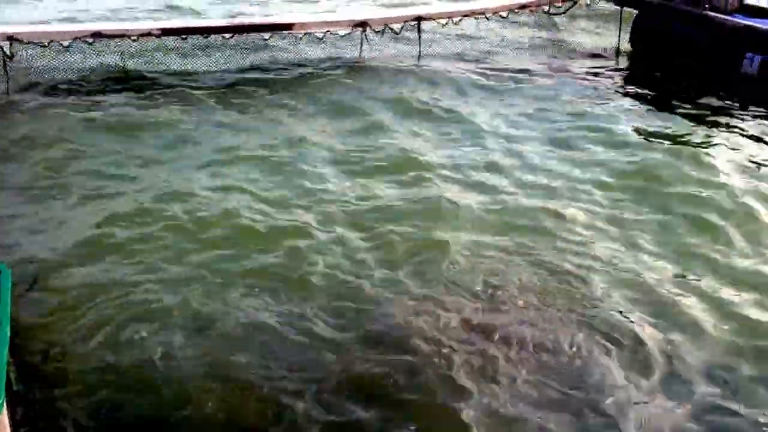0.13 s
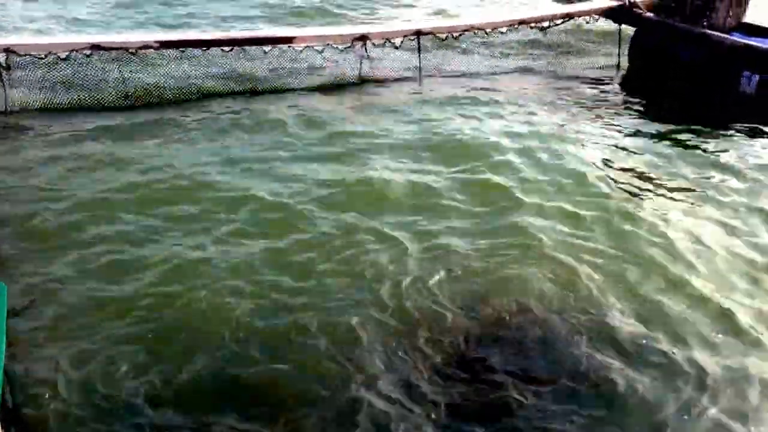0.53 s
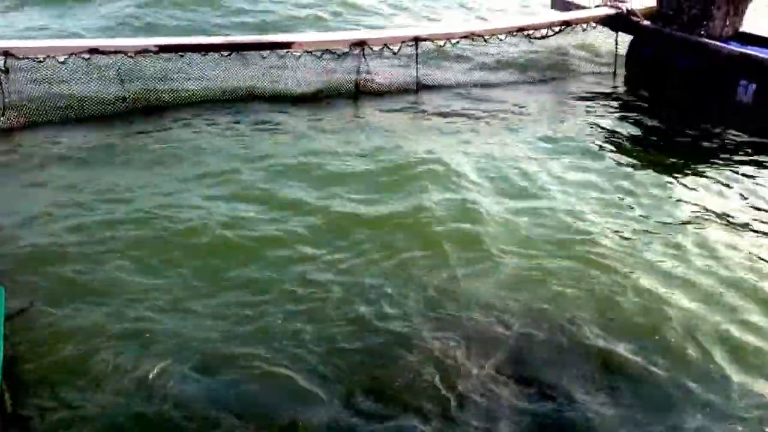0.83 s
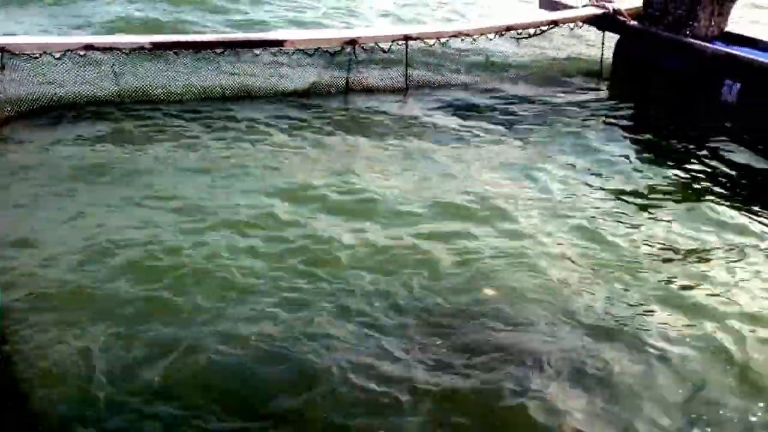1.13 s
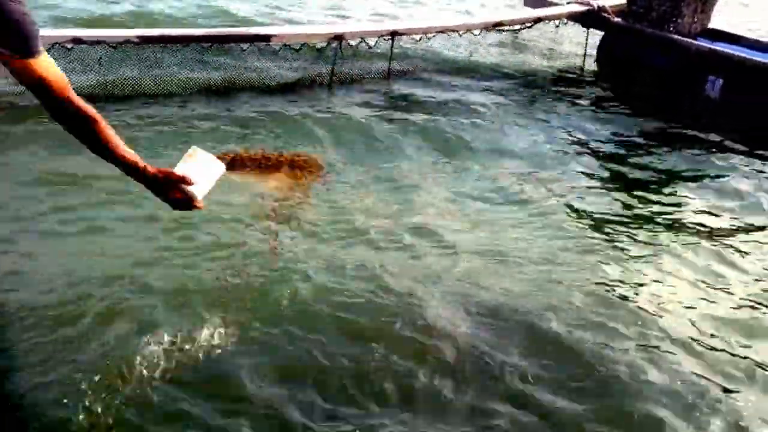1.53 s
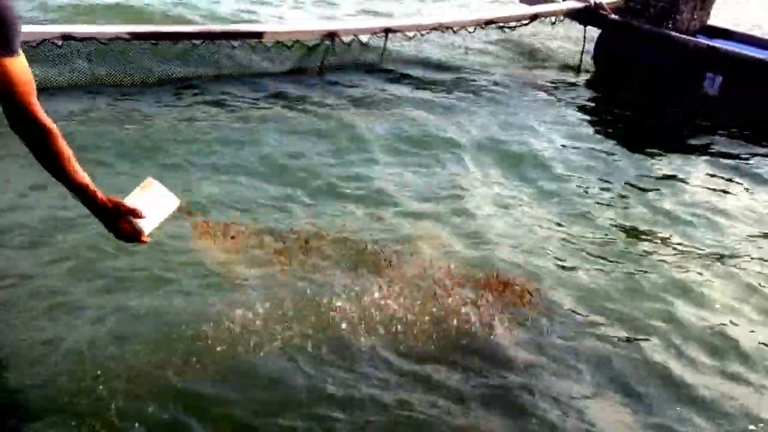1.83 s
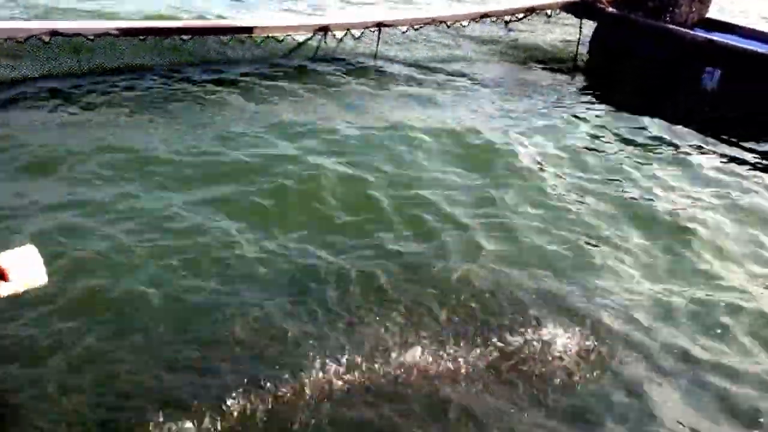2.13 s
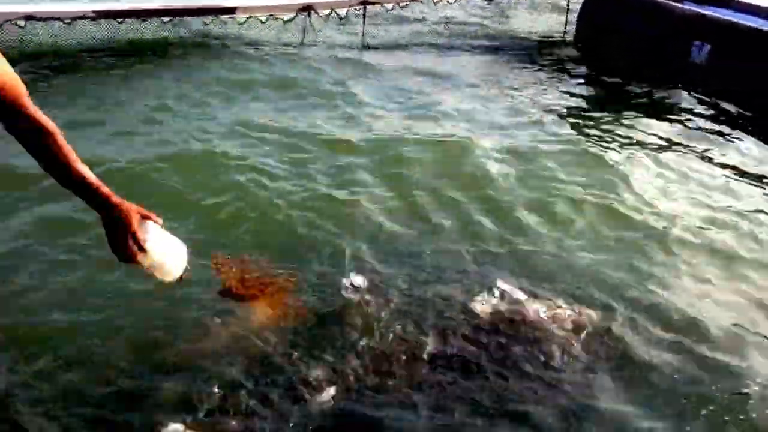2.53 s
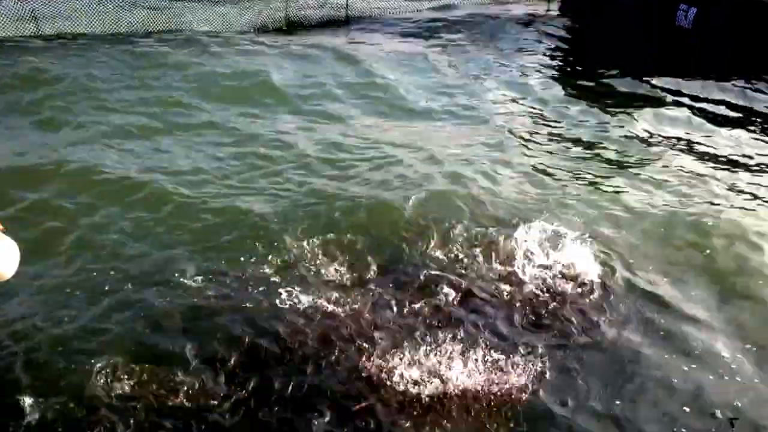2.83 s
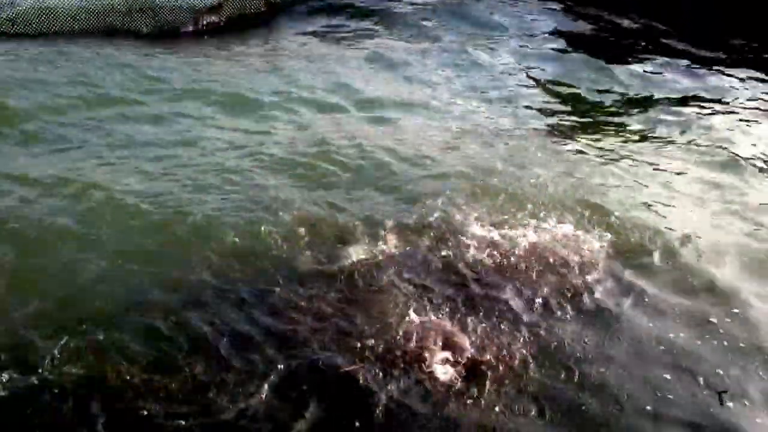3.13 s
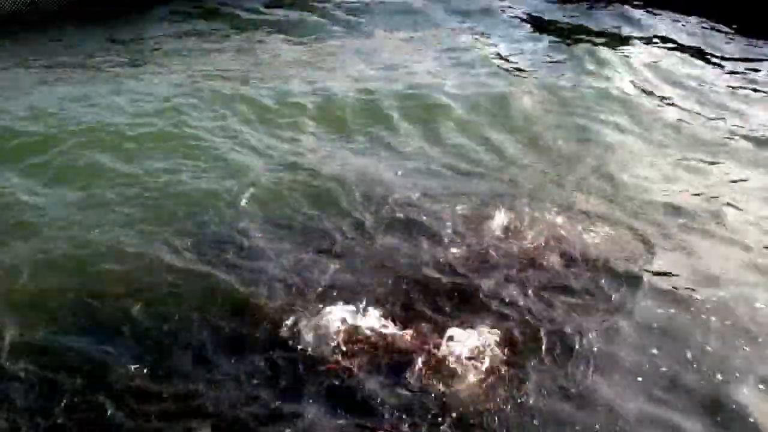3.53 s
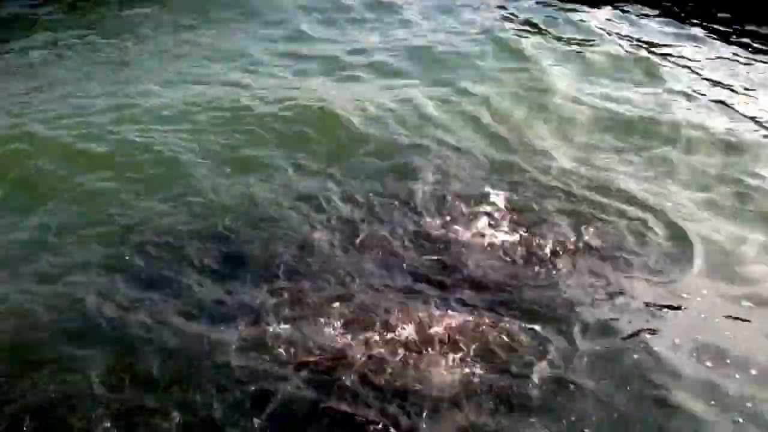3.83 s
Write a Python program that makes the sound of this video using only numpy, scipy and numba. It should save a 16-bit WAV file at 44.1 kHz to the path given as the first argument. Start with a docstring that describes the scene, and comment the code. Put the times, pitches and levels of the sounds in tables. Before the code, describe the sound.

Sharp, popping fish slaps and wet flops break out after a quieter lapping start, with short showers of pellets on water, single drips and hollow float knocks, heard close outdoors.

```python
"""Feeding time at a floating fish pen

Heard from the edge: fish snap and thrash, each slap a pressure crack, a ringing air pocket and grainy spray.
Flops are bursts of tiny bubbles, gulps and drops single rising bubbles; pellets slide and patter as ticks.
Waves thump the floats as short pressure pulses, and low grains slosh under them.
Behind it all the churning surface is a cloud of small bubbles over soft noise."""
import sys
import numpy as np
from scipy import signal
from scipy.fft import rfft, irfft
from scipy.io import wavfile
from numba import njit

SR = 44100
rng = np.random.default_rng(int(sys.argv[2]) if len(sys.argv) > 2 else 0)


def output_pcm(signal):
    """Save a mono or channel-first signal as 16-bit PCM at the path in sys.argv[1].

    Samples are clipped to [-1, 1] before scaling.
    """
    pcm = np.clip(np.atleast_2d(signal).T, -1, 1) * 32767
    wavfile.write(sys.argv[1], SR, np.round(pcm).astype(np.int16))


N = 176400  # four seconds

# Spectra: f/Hz, level/dB (per Hz, relative within each table)
# fish slaps: t/s, crack level/dB, air pocket level/dB, pocket f/Hz, spray level/dB
SLAPS = [(0.0345, -17, -21, 3620, -29.5), (1.8317, -7, -15, 2780, -23), (2.4932, -13.5, -20.5, 2390, -46),
         (2.6344, -18, -12, 3710, -28), (2.6914, -7, -18, 1304, -37), (3.0243, -31, -11, 3550, -59),
         (3.6226, -1, -7.5, 2780, -35), (3.977, -34, -21, 2920, -30.5)]
# spectrum of thrown spray: f/Hz, level/dB
SPRAY_SPECTRUM = [(150, -34), (400, -1.5), (3200, 3), (8000, -7.5), (15000, -17)]
# wet flops of fins and tails: t/s, level/dB, middle f/Hz
FLOPS = [(1.7310, -27.5, 1700), (1.753, -27.5, 2200), (1.782, -28, 1410), (1.840, -31, 1700),
         (1.976, -38, 3300), (2.053, -25.5, 2030), (2.264, -33, 1300), (2.564, -34, 1200),
         (2.643, -32, 2400), (2.79, -30, 3200), (3.028, -26.5, 3140), (3.917, -39, 2400)]
# gulps and large bubbles: t/s, level/dB, f/Hz
GULPS = [(.091, -32.5, 620), (1.78, -27.5, 637), (1.798, -29, 1140), (1.828, -24, 870), (2.451, -30, 770),
         (2.501, -30.5, 1090), (2.636, -29.5, 690), (3.1318, -26, 1490), (3.438, -28.5, 940),
         (3.493, -23.5, 510), (3.577, -27, 596), (3.919, -38, 332), (3.9695, -14.5, 1510)]
# single drops and small snaps: t/s, level/dB, f/Hz
DROPS = [(.8575, -30, 6500), (1.203, -24.5, 5400), (1.412, -30.5, 3600), (2.1988, -22, 3800),
         (2.4749, -24.5, 3630), (2.7668, -25, 2720), (3.5658, -22.5, 4100), (3.640, -29, 5550)]
# pellets shifting and sliding in the scoop: t/s, length/s, level/dB
SLIDES = [(.85, 0.071, -45), (.98, 0.078, -43.5), (1.07, 0.059, -45), (1.39, 0.3, -45),
          (2.52, 0.095, -42.5)]
# spectrum of sliding pellets: f/Hz, level/dB
SLIDE_SPECTRUM = [(1500, -11), (3000, 0.5), (3900, 4), (5000, -5), (12000, -23)]
# showers of pellets and thrown water landing: t/s, length/s, level/dB
SHOWERS = [(-.03, 0.15, -55.5), (1.68, 0.11, -43), (2.03, 0.12, -36), (2.885, 0.081, -36),
           (3.962, .06, -32)]
# spectrum of the showers: f/Hz, level/dB
SHOWER_SPECTRUM = [(120, -59), (200, -45), (321, -15), (630, -6.5), (1400, -6), (1950, -6.5), (2850, -1),
                   (15500, -21.5)]
# hollow thumps of waves under the floats, and at 1.833 s the low body of a fish's gulp: t/s, level/dB, f/Hz,
# half-width/cycles
THUMPS = [(0.0875, -17, 340, 0.37), (0.0965, -16.5, 332, 0.28), (0.1033, -22, 226, 2),
          (0.196, -30, 152, 0.63), (0.7831, -17.5, 208, 0.29), (0.8645, -23, 251, 0.29),
          (1.044, -25.5, 233, 0.52), (1.078, -20, 230, 0.72), (1.222, -36.5, 159, 1.8),
          (1.353, -38.5, 152, 0.74), (1.833, -22, 323, 0.76), (1.978, -34, 142, 0.43),
          (2.215, -33.5, 263, 1.9), (2.260, -33, 182, 0.61), (2.497, -32, 161, 0.53),
          (2.752, -42.5, 140, 0.64)]
# sloshes under the floats: t/s, length/s, level/dB
SLOSHES = [(.078, 0.041, -31), (.735, 0.051, -41.5), (.905, 0.015, -40), (1.195, 0.0077, -43),
           (2.195, 0.029, -41.5)]
# spectrum of sloshing and lapping: f/Hz, level/dB
SLOSH_SPECTRUM = [(40, -19.5), (150, 0), (260, 1), (450, -11.5), (2500, -26.5)]
# churning of the surface: t/s, level/dB
CHURN = [(0, -37), (.2, -46.5), (.45, -49.5), (.75, -51.5), (1.02, -45.5), (1.34, -54), (1.6, -51),
         (1.75, -40), (2.3, -46), (2.40, -48.5), (2.58, -42.5), (3.15, -43.5), (3.35, -48), (3.55, -45),
         (3.70, -49), (4.0, -50.5)]
# spectrum of the churning surface: f/Hz, level/dB
WATER_SPECTRUM = [(190, -19), (330, -4.5), (660, -2.5), (1180, -4.5), (1800, -5.5), (2950, -4.5),
                  (4010, -4.5), (15500, -25)]

# Slaps: crack pitch is a ratio to the pocket's; the splat is the water sheet tearing, relative to the crack
CRACK_RATIO, CRACK_HALF_WIDTH_CYCLES = 1.374, 0.51
POCKET_CYCLES, POCKET_RISE, POCKET_SWELL_CYCLES = 19.4, 0.013, 0.65
SPLAT_DB, SPLAT_DECAY_S = -30.5, 0.0075
SPRAY_DECAY_S, SPRAY_LEAD_S = 0.0058, 0.0061
# Flops, gulps and drops: froth and drop spray are relative to their bubble
FLOP_OCTAVES, FLOP_DECAY_S, FLOP_LEAD_S = 1.44, 0.004, 0.002
GULP_CYCLES, GULP_SWELL_CYCLES = 10.5, 3.5
BUBBLE_RISE = 0.11  # fractional rise in pitch, shared by gulps and bubble clouds
FROTH_DB, FROTH_DECAY_S, FROTH_OCTAVES = -11.5, 0.0074, 0.84
DROP_CYCLES, DROP_SPRAY_DB = 16, -10
# Pellets: bubbles are relative to the ticks
SLIDE_ATTACK_S, SLIDE_RELEASE_S = 0.11, 0.0078
SHOWER_ATTACK_S, SHOWER_RELEASE_S, SHOWER_SCATTER_DB = 0.027, 0.058, 2.5
SHOWER_BUBBLE_DB, SHOWER_BUBBLE_CYCLES = -15, 22
CLUMP_DB = 1.26  # unevenness of the pellets' flow
# Floats: the ring is relative to the thump
THUMP_RING_DB, THUMP_RING_CYCLES = -18.5, 5
SLOSH_ATTACK_S, SLOSH_RELEASE_S = 0.0024, 0.029
LAPPING_START_DB, LAPPING_FADE_DB_PER_S = -50.5, 3
# Surface: wash is relative to the fizz of bubbles, babble to the water at the strongest churn
FIZZ_CYCLES, FIZZ_SCATTER_DB, WASH_DB = 54, 2.8, -0.5
BABBLE_DB, BABBLE_CYCLES, BABBLE_SCATTER_DB = -2.5, 31, 2
FLICKER_DB = 2  # spread of the random level changes in lapping and surface
# Space and microphone
ECHO_DB, ECHO_DECAY_S = -12, 0.011
LOW_CUT_HZ, TOP_HZ = 105, 15550


def undb(db):
    """Turn decibels into gain."""
    return 10 ** (np.asarray(db) / 20)


def unit(x):
    """Scale to rms 1."""
    return x / np.sqrt(np.mean(x ** 2))


def colour(x, points):
    """Filter a sound by a curve of (Hz, dB) points, drawn over log frequency, at rms 1."""
    hz, db = np.array(points, float).T
    f = np.maximum(np.arange(N // 2 + 1) * SR / N, 1)
    curve_db = np.interp(np.log(f), np.log(np.maximum(hz, 1)), db)
    return unit(irfft(rfft(x) * undb(curve_db), N))


def around(x, hz, octaves):
    """Band-pass a sound some octaves either side of a pitch, at rms 1."""
    edges = [hz / 2 ** octaves, min(hz * 2 ** octaves, SR / 3)]
    band = signal.butter(2, edges, "band", fs=SR, output="sos")
    return unit(signal.sosfilt(band, x))


def add(out, start, sound):
    """Mix a sound in at a time in seconds, trimming whatever falls outside the scene."""
    i = int(start * SR)
    part = sound[max(-i, 0):max(N - i, 0)]
    out[max(i, 0):max(i, 0) + len(part)] += part


def walk(rate):
    """Wander at random between new values, rate of them a second, at rms 1."""
    steps = rng.standard_normal(1024)
    return unit(np.interp(np.arange(N) / SR * rate, np.arange(1024), steps))


def swells(rows, attack, release):
    """Sum envelopes that each rise toward a level and start to die away after their length."""
    t = np.arange(N) / SR
    total = np.zeros(N)
    for start, length, db in rows:
        rise = np.clip((t - start) / attack, 0, 1)
        fall = np.exp(-np.maximum(t - start - length, 0) / release)
        total += undb(db) * rise * fall
    return total


@njit
def ring(start, hz, cycles, size, rise, n):
    """Sum many small sines, each dying by 60 dB over its cycles while its pitch glides up by rise."""
    out = np.zeros(n)
    for k in range(len(start)):
        life, phase = cycles[k] * SR / hz[k], 0.
        for j in range(min(int(life), n - start[k])):
            phase += 2 * np.pi * hz[k] / SR * (1 + rise * j / life)
            out[start[k] + j] += size[k] * np.exp(-6.9 * j / life) * np.sin(phase)
    return out


def grains(low_hz, high_hz, cycles, scatter_db, rise, count):
    """Scatter bubbles or ticks of random time, pitch, life and size; gain follows pitch for an even spectrum."""
    when, pitch, life, size = rng.random((count, 4)).T
    hz = low_hz * (min(high_hz, SR / 3) / low_hz) ** pitch
    size_db = -scatter_db * np.log(np.maximum(size, 1 / 200))  # few large, many small
    gain = undb(size_db) * hz / high_hz
    starts = (when * N).astype(np.int64)
    return unit(ring(starts, hz, cycles * (.5 + life), gain, float(rise), N))


def bubble(hz, cycles, rise, swell):
    """Ring one air pocket: it swells, glides up by rise and dies by 60 dB over its cycles; envelope peak 1."""
    turns = np.arange(N // 20) / SR * hz
    env = (1 - np.exp(-(turns / swell) ** 2)) * np.exp(-np.log(1000) * turns / cycles)
    glide = 1 + rise * np.minimum(turns / cycles, 2) / 2
    return env / env.max() * np.sin(2 * np.pi * turns * glide)


def add_push(out, s, db, hz, cycles):
    """Mix in a brief push then pull of pressure, a sine under a bell-shaped envelope centred on s."""
    turns = hz * np.arange(-SR // 50, SR // 50) / SR
    push = np.sin(2 * np.pi * turns) * np.exp(-(turns / cycles) ** 2)
    add(out, s - 1 / 50, -undb(db) * push / push.max())


def add_spray(out, spray, s, db, decay, lead):
    """Mix in a random stretch of grains that builds up to s, as the surface breaks, and dies away after."""
    t = np.arange(-SR // 50, SR // 10) / SR
    env = np.exp(np.minimum(t / lead, -t / decay))
    stretch = np.roll(spray, -rng.integers(N))[:len(t)]
    add(out, s + t[0], undb(db) * env * stretch)


def add_slaps(out, spray):
    """Each slap cracks the surface, traps a ringing air pocket, tears the water sheet and throws spray."""
    for s, crack_db, pocket_db, hz, spray_db in SLAPS:
        add_push(out, s, crack_db, hz * CRACK_RATIO, CRACK_HALF_WIDTH_CYCLES)
        pocket = bubble(hz, POCKET_CYCLES, POCKET_RISE, POCKET_SWELL_CYCLES)
        add(out, s, -undb(pocket_db) * pocket)
        add_spray(out, spray, s, crack_db + SPLAT_DB, SPLAT_DECAY_S, SPLAT_DECAY_S / 10)
        add_spray(out, spray, s, spray_db, SPRAY_DECAY_S, SPRAY_LEAD_S)


def add_flops(out, spray):
    """Fins and tails flop wetly, each a burst of small bubbles around one pitch."""
    for s, db, hz in FLOPS:
        add_spray(out, around(spray, hz, FLOP_OCTAVES), s, db, FLOP_DECAY_S, FLOP_LEAD_S)


def add_gulps(out, spray):
    """Mouths gulp: one slowly swelling, rising bubble amid a froth of others near its pitch."""
    for s, db, hz in GULPS:
        add(out, s, undb(db) * bubble(hz, GULP_CYCLES, BUBBLE_RISE, GULP_SWELL_CYCLES))
        froth = around(spray, hz, FROTH_OCTAVES)
        add_spray(out, froth, s + 2 / hz, db + FROTH_DB, FROTH_DECAY_S, FLOP_LEAD_S * 2)


def add_drops(out, spray):
    """Drops and small snaps each ring one high bubble with a short puff of spray."""
    for s, db, hz in DROPS:
        add(out, s, undb(db) * bubble(hz, DROP_CYCLES, rise=0.16, swell=0.96))
        add_spray(out, spray, s, db + DROP_SPRAY_DB, SPRAY_DECAY_S / 2, SPRAY_LEAD_S / 2)


def fish():
    """Slaps, flops, gulps and drops, all drawing their spray from one cloud of bubble grains."""
    out = np.zeros(N)
    spray = colour(grains(390, 17800, 16.7, scatter_db=2.5, rise=0.23, count=30000), SPRAY_SPECTRUM)
    add_slaps(out, spray)
    add_flops(out, spray)
    add_gulps(out, spray)
    add_drops(out, spray)
    return out


def pellets():
    """Dry pellets rustle as short ticks, then patter on the water in clumps, some trapping a bubble."""
    rustle = colour(grains(1120, 12000, 3.5, scatter_db=2.4, rise=0, count=16000), SLIDE_SPECTRUM)
    slide = rustle * swells(SLIDES, SLIDE_ATTACK_S, SLIDE_RELEASE_S)
    ticks = grains(344, 15000, 6.9, SHOWER_SCATTER_DB, rise=0, count=18000)
    bubbles = grains(516, 5630, SHOWER_BUBBLE_CYCLES, SHOWER_SCATTER_DB, BUBBLE_RISE, count=1800)
    patter = colour(ticks + undb(SHOWER_BUBBLE_DB) * bubbles, SHOWER_SPECTRUM)
    shower = patter * swells(SHOWERS, SHOWER_ATTACK_S, SHOWER_RELEASE_S)
    clumps = undb(CLUMP_DB * walk(60))
    return (slide + shower) * clumps


def floats():
    """Waves lap and slosh under the floats as low bubbles, and thump them with a pulse and a short hollow ring;
    one such thump is the low body of a fish's gulp."""
    calming_db = LAPPING_START_DB - LAPPING_FADE_DB_PER_S * np.arange(N) / SR
    lapping = undb(calming_db + FLICKER_DB * walk(6.9))
    level = swells(SLOSHES, SLOSH_ATTACK_S, SLOSH_RELEASE_S) + lapping
    out = colour(grains(57.0, 1740, 5.5, scatter_db=2.1, rise=0.17, count=2500), SLOSH_SPECTRUM) * level
    for s, db, hz, cycles in THUMPS:
        add_push(out, s, db, hz, cycles)
        hollow = bubble(hz, THUMP_RING_CYCLES, rise=0, swell=0.8)
        add(out, s, -undb(db + THUMP_RING_DB) * hollow)
    return out


def surface():
    """Small bubbles fizz over a soft noise wash, with a mid-pitched babble that gains as the churn grows."""
    fizz = grains(150.0, 13400, FIZZ_CYCLES, FIZZ_SCATTER_DB, BUBBLE_RISE, count=12000)
    wash = undb(WASH_DB) * rng.standard_normal(N)
    water = colour(fizz + wash, WATER_SPECTRUM) * undb(FLICKER_DB * walk(21.76))
    babble = grains(454, 1520, BABBLE_CYCLES, BABBLE_SCATTER_DB, BUBBLE_RISE, count=320)
    churn = undb(np.interp(np.arange(N) / SR, *np.array(CHURN).T))
    return (water + undb(BABBLE_DB) * babble * churn / churn.max()) * churn


def frame_echoes(near):
    """The pen's frame returns faint, short echoes: a convolution with a quickly fading noise tail."""
    t = np.arange(N // 20) / SR
    tail = rng.standard_normal(len(t)) * np.exp(-t / ECHO_DECAY_S) * (1 - np.exp(-t / 0.0022))
    return undb(ECHO_DB) * signal.fftconvolve(near, tail / np.linalg.norm(tail))[:N]


def scene():
    """Mix all sources in the open air; only fish and pellets echo."""
    near = fish() + pellets()
    return (near + frame_echoes(near) + floats() + surface())[None]


def record(dry):
    """A small microphone thins the bass and cuts the top steeply."""
    thin = signal.sosfilt(signal.butter(2, LOW_CUT_HZ, "high", fs=SR, output="sos"), dry)
    return signal.sosfilt(signal.ellip(10, .2, 70, TOP_HZ, fs=SR, output="sos"), thin)


dry = scene()
out = record(dry)
output_pcm(out)
```